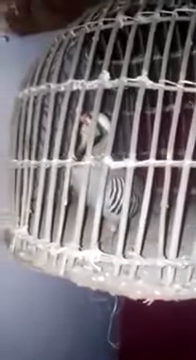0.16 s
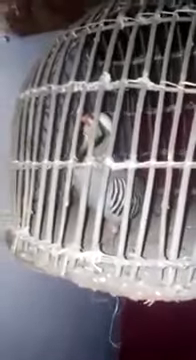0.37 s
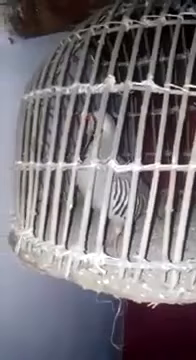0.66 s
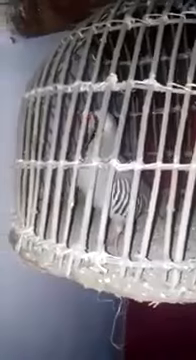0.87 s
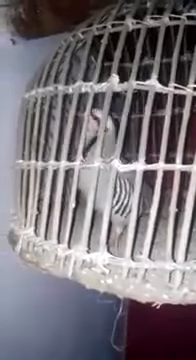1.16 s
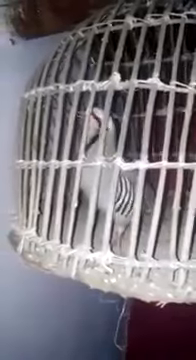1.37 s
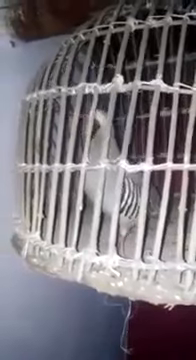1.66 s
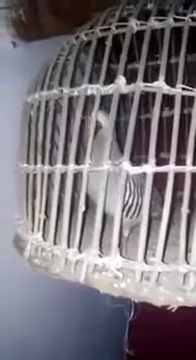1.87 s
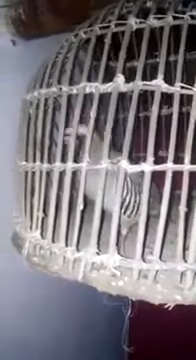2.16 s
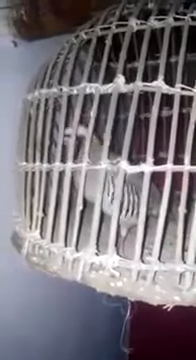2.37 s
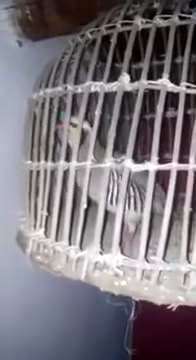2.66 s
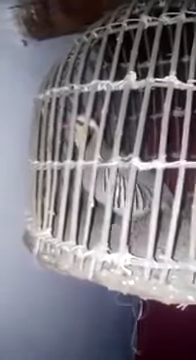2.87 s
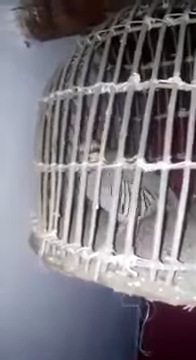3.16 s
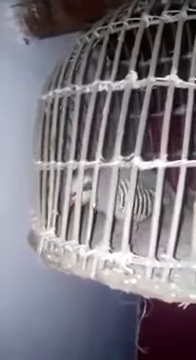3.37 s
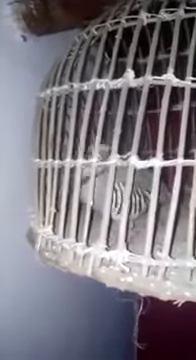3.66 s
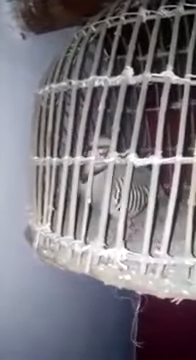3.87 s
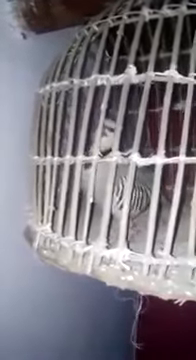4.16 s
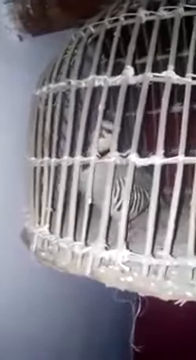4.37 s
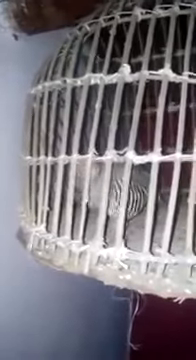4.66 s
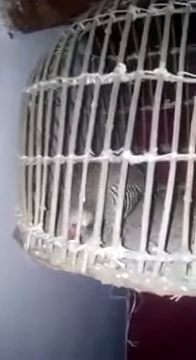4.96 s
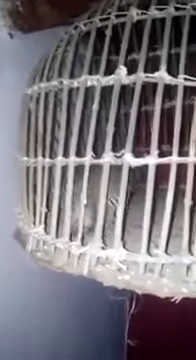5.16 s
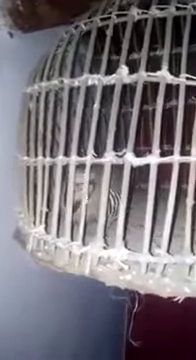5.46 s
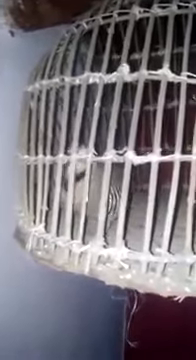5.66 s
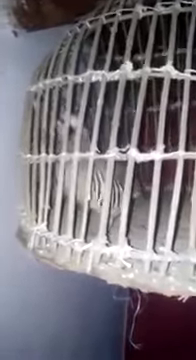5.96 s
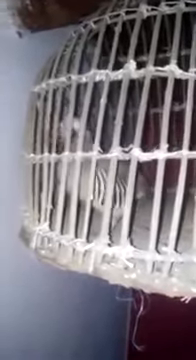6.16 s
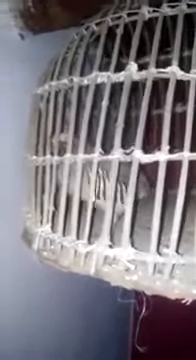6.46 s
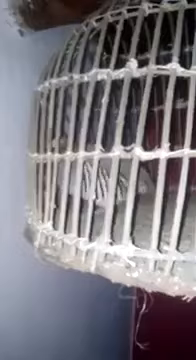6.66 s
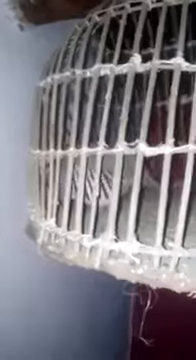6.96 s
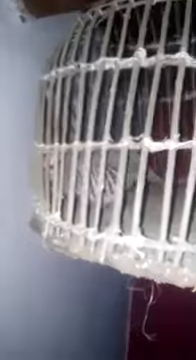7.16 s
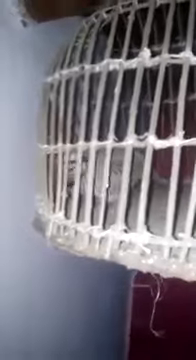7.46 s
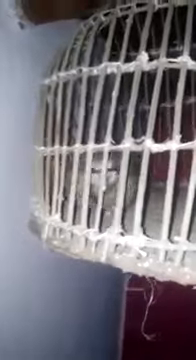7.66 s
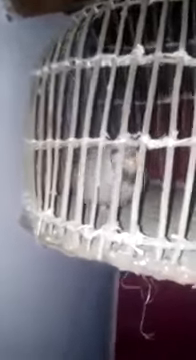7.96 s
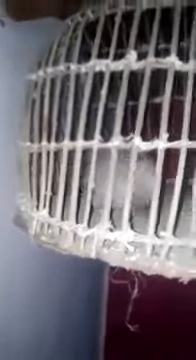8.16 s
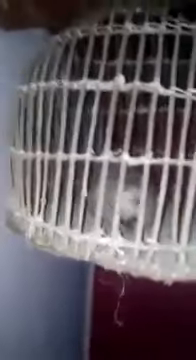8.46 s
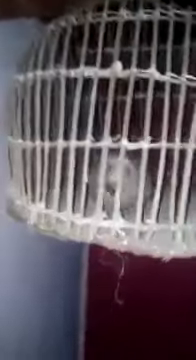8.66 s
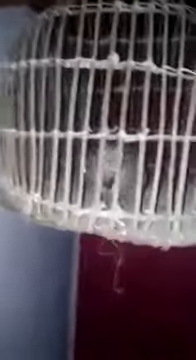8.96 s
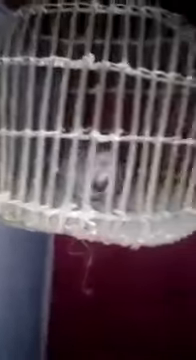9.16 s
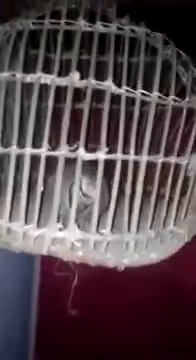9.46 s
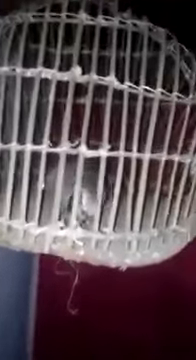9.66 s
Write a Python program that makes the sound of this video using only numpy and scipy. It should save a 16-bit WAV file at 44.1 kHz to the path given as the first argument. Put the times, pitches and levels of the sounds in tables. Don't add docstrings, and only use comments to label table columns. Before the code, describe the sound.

Harsh, evenly repeated bird crows with soft notes between them break into clucks and quick low chuckles, then quiet foot rustles in a small bare room.

```python
import sys
import numpy as np
from scipy import signal
from scipy.fft import rfft, irfft, next_fast_len
from scipy.io import wavfile
from scipy.ndimage import uniform_filter1d, minimum_filter1d, map_coordinates

SR = 44100
rng = np.random.default_rng(int(sys.argv[2]) if len(sys.argv) > 2 else 0)


def gain_from_db(level_db):
    decades = np.asarray(level_db, float) / 20
    return 10 ** decades


def to_wav(s):
    ch = np.atleast_2d(s).T
    pcm = np.round(np.clip(ch, -1, 1) * 32767)
    wavfile.write(sys.argv[1], SR, pcm.astype(np.int16))


N = 432614

# frequency in Hz, level in dB per Hz.
AIR_SPECTRUM = [(25, -16), (70, -8), (85, 5), (100, -8), (250, -11), (500, -22), (1500, -30), (2600, -23),
                (4000, -15), (7000, -16), (9000, -24), (14000, -28)]
# time in seconds, level in dB.
AIR_LEVEL = [(0, -83), (4.4, -83), (4.9, -90), (8.1, -88), (8.45, -83), (8.7, -88), (9.8, -89)]
# frequency in Hz, time to fall 60 dB in seconds.
ROOM_DECAY = [(400, 0.28), (1500, 0.23), (4000, 0.21), (10000, 0.15)]
TAIL_RENEWAL_S = 0.37

# start in seconds, peak in dB, thump in dB.
RUSTLES = [(8.1534, -51.5, -2.5), (8.202, -41, -28.5), (8.381, -42, -9), (8.482, -58.5, 3),
           (8.5899, -46, -26), (8.823, -53.5, 4), (8.9792, -68.5, -4), (9.0407, -50.5, -20),
           (9.3005, -47.5, -25), (9.56, -66, -9), (9.652, -63, -12), (9.7506, -49, -11),
           (9.7759, -37, -3.5), (9.8041, -22.5, -36)]
# frequency in Hz, level in dB per Hz.
SCRATCH_SPECTRUM = [(710, -52.5), (1200, -36), (2930, -13), (3350, -3.5), (5670, -7), (12600, -21),
                    (14000, -43.5)]
# frequency in Hz, level in dB per Hz.
THUMP_SPECTRUM = [(18, -34), (30, -13.5), (193, -5.5), (491, -12.5), (782, -14), (1270, -41), (1600, -36),
                  (2080, -66), (3520, -120)]
RUSTLE_S = 0.053

# start in seconds, peak in dB, low tones in dB, length in seconds.
SOFT_NOTES = [(0.009, -25, -15, 0.071), (0.384, -22, -16.5, 0.0634), (0.81, -21.5, -16, 0.0631),
              (1.221, -20, -18, 0.057), (1.648, -21, -14, 0.0577), (2.0744, -22.5, -17, 0.05),
              (2.51, -22, -14, 0.037), (2.791, -26, -32, 0.046), (3.126, -21, -15, 0.0592),
              (3.219, -23, -17, 0.059), (3.565, -20, -14, 0.095), (3.883, -21.5, -12, 0.0477),
              (4.158, -23.5, -14, 0.12), (4.445, -44.5, -34, 0.01533)]
# frequency in Hz, level in dB per Hz.
SOFT_BODY = [(180, -82), (300, -42.5), (561, -25.5), (872, -12), (1020, -11), (1750, -3), (1910, 2),
             (2260, -5), (2610, -4.5), (3230, -47), (5090, -12.5), (9000, -53), (11700, -80.5),
             (19800, -120)]
# start in seconds, peak in dB, low tones in dB, length in seconds, pitch in Hz.
CHUCKLE_THROBS = [(5.2324, -62, 26, 0.0175, 564), (6.44, -35, -4, 0.0155, 526),
                  (6.4672, -17, -7.5, 0.013, 581.6), (6.4957, -29, 0, 0.023, 548.5),
                  (6.533, -34, 6.5, 0.01534, 390.1), (6.701, -29.5, -1, 0.028, 622),
                  (6.7344, -25, -4.5, 0.021, 780), (6.8614, -22.5, 0, 0.033, 642),
                  (7.0306, -22.5, -5.5, 0.033, 790), (7.0728, -22, -3.5, 0.019, 825.6),
                  (7.1123, -25.5, -5.5, 0.0161, 519), (7.1895, -25, 0.5, 0.029, 412.4),
                  (7.3072, -25, -2, 0.022, 557), (7.3226, -19, -2.5, 0.03, 662),
                  (7.4047, -21, -3, 0.013, 373.7), (7.572, -37.5, -0.5, 0.0118, 530),
                  (7.5855, -14.5, -15, 0.016, 567.8), (7.6218, -14, -12, 0.01056, 580),
                  (7.659, -22.5, -4, 0.019, 523)]
# frequency in Hz, level in dB per Hz.
CHUCKLE_BODY = [(150, -57), (250, -14.5), (664, -7.5), (899, -10), (1300, -7), (1590, -17.5), (2050, -3),
                (3180, -13), (4160, -2.5), (4680, -6.5), (12000, -39.5), (14000, -61)]
# start in seconds, peak in dB, low tones in dB, length in seconds, pitch in Hz.
LAST_NOTES = [
    (7.905, -46.5, 14.5, 0.033, 578),
    (8.98, -54, -14, .02, 2200),
]

# frequency in Hz, gain in dB.
THROAT = [(230, -27.5), (410, -20.5), (475, 4), (560, -2.5), (700, -9.5), (1000, -6.5), (1400, -4.5),
          (2400, -4.5), (3200, -10), (3600, -32)]
# start in seconds, length in seconds, level in dB, widest beak resonance in Hz,
# hoarseness in dB.
CLUCKS = [(4.979, 0.15, -22, 1684, 8), (5.048, .12, -22.5, 1600, 23), (5.19, .045, -31, 1220, 25),
          (5.299, 0.053, -26, 1562, 25.5), (5.328, 0.094, -23, 1150, 4), (5.475, .085, -17, 1574, -2),
          (5.688, 0.1377, -17, 1658, -6.5), (5.969, 0.17, -18, 1450, -3.5), (6.207, 0.06, -18.5, 2237, 9.5)]
# share of length, effort in dB, beak opening from 0 to 1,
# extra breath in dB, low partials in dB.
CLUCK_SHAPE = [(0, -27, .98, 3.5, 11.5), (.15, -5, 0.87, 4, -11.5), (.55, -0.5, .5, -2, -17),
               (1, -9.5, 0, -0.5, -11)]
# time in seconds, pitch in Hz, upper partials in dB.
CLUCK_VOICE = [(4.98, 521.3, -28), (5.045, 543.6, -2), (5.074, 686, 1), (5.16, 643.4, -5),
               (5.236, 586, -2.5), (5.3, 636, -8), (5.353, 526, -17.5), (5.409, 513, -24.5),
               (5.475, 646.7, -9.5), (5.558, 612, -14.5), (5.689, 452.6, -10.5), (5.821, 454.4, -8.5),
               (5.97, 623, -3.5), (6.03, 565.7, -23), (6.119, 568.4, -18), (6.205, 502.3, -1.5),
               (6.259, 534, -9.5)]
# frequency in Hz, level in dB per Hz.
CLUCK_HISS = [(1880, -21), (3200, -9), (3970, -2.5), (4470, -5), (6270, -12), (8030, -38.5), (12300, -46.5),
              (13200, -32), (14000, -88.5)]
CLUCK_SHUT_RATIO, CLUCK_HISS_DB = 0.83, -15

# start in seconds, length in seconds, level in dB, widest beak resonance in Hz,
# share of the length at which the beak is widest.
CROWS = [(0.117, 0.22, -9, 1519, 0.5015), (0.523, .225, -9, 1815, 0.39), (0.932, 0.23, -9.5, 1720, 0.41),
         (1.358, 0.2441, -9, 1840, 0.39), (1.783, 0.2, -9.5, 1507, 0.58), (2.145, 0.26, -9, 1736, 0.48),
         (2.533, .24, -9, 1885, 0.45), (2.94, 0.18, -10.5, 1450, 0.49), (3.279, 0.19, -11.5, 1620, 0.35),
         (3.591, .2, -9, 1670, 0.57), (3.921, 0.17, -10, 1743, 0.47), (4.207, .19, -11, 2040, 0.38),
         (4.558, 0.18, -11, 1850, 0.57)]
# share of length, effort in dB,
# beak opening from 0 to 1, extra breath in dB, low partials in dB.
CROW_SHAPE = [(0, -14, 0, -14, -1.5), (.07, -6.5, 0.83, 7.5, -11.5), (0.271, 0.5, 0.5, 1, -15),
              (0.451, -2, 1.05, 1.5, -13), (.65, -.5, 0.55, .5, -14), (.85, -3, 0.2, 1, -16),
              (1.001, -5, .02, 0, -10.5)]
# time in seconds, pitch in Hz, shut beak resonance in Hz,
# fundamental over second partial in dB, upper partials in dB.
CROW_VOICE = [(0.113, 509.6, 1277, -6.5, -17), (.525, 491.8, 1266, -3, -18.5), (.93, 470.3, 1260, 0, -19.5),
              (1.354, 466.5, 1174, 2.5, -23), (2.145, 460, 1218, -1.5, -19), (2.53, 517.3, 1335, -5, -14.5),
              (2.94, 481.4, 1190, 6.5, -16), (3.28, 443.6, 1680, -19.5, -6.5),
              (3.591, 469.8, 1712, -33, -16.5), (3.92, 468.8, 1426, 9, -15.5),
              (4.21, 399.2, 1513, -10.5, -9.5), (4.555, 407.7, 1543, -15, -10)]
# time in seconds, share of air noise.
CROW_RASP = [(0.115, .28), (.93, .23), (1.785, .13), (2.145, .28), (2.94, .2), (3.28, .3), (3.59, .16),
             (3.92, .16), (4.21, .3)]
# frequency in Hz, level in dB per Hz.
CROW_HISS = [(1880, -12), (3200, -34), (3420, -18.5), (3710, -2.5), (4120, -16), (4810, 1), (5540, -7.5),
             (6390, -3.5), (6800, -6), (7230, -14), (8540, -50.5), (12500, -24), (14000, -52.5)]
CROW_START, CROW_END = 0.93, 0.91
CROW_HISS_DB, UPPER_DB_PER_KHZ, HISS_DB_PER_KHZ = -19.5, 18.5, 24

# frequency in Hz, side under the middle in dB.
SIDE_SPREAD = [(3300, -55), (4200, -8), (6000, -6), (13000, -5)]
TOP_HZ = 13100


def unit(x):
    return x / np.sqrt(np.mean(x ** 2) + 1e-20)


def along(points, hz):
    f, v = np.transpose(points)
    return np.interp(np.log(hz + 1), np.log(f + 1), v)


def wobble(n, rate):
    knots = rng.standard_normal(int(n * rate / SR) + 4)
    return map_coordinates(knots, [np.arange(n) * rate / SR])


def filtered(x, gain):
    m = next_fast_len(x.shape[-1] + 4096)
    spectrum = rfft(x, m) * gain(np.fft.rfftfreq(m, 1 / SR))
    return irfft(spectrum, m)[..., :x.shape[-1]]


def add(track, s, x):
    part = track[round(s * SR):][:len(x)]
    part += x[:len(part)]


def room_air():
    air = unit(filtered(rng.standard_normal(N), lambda f: gain_from_db(along(AIR_SPECTRUM, f))))
    air_db = np.interp(np.arange(N) / SR, *np.transpose(AIR_LEVEL))
    return gain_from_db(air_db + 24.5) * air


def room(x):
    out, step = np.zeros(N + SR), round(TAIL_RENEWAL_S * SR)
    late = np.pad(x, (step + 130, 2 * step))
    for start in range(0, N + step, step):
        hz, t, z = signal.stft(rng.standard_normal(SR // 2), SR, nperseg=256)
        decay = gain_from_db(-60 * t / along(ROOM_DECAY, hz)[:, None])
        tail = signal.istft(z * decay, SR, nperseg=256)[1]
        source = late[start:][:2 * step] * np.hanning(2 * step)
        answer = signal.fftconvolve(source, tail / np.linalg.norm(tail))
        add(out, max(start - step, 0) / SR, answer[max(step - start, 0):])
    return out[:N]


def swell(length, rise):
    t = np.arange(round((length + 0.026) * SR)) / SR
    return (1 - np.exp(-(t / rise) ** 2)) * gain_from_db(-60 * np.clip(t - length, 0, 1) / 0.023)


def rustles():
    out = np.zeros(N)
    for s, db, thump_db in RUSTLES:
        shape = swell(RUSTLE_S, 0.0022)
        n = len(shape)
        shape = shape * np.exp(-np.arange(n) / SR / 0.04) * gain_from_db(2 * wobble(n, 90))
        noise = rng.standard_normal((2, n))
        scratch = unit(filtered(noise[0], lambda f: gain_from_db(along(SCRATCH_SPECTRUM, f))))
        thump = unit(filtered(noise[1], lambda f: gain_from_db(along(THUMP_SPECTRUM, f))))
        add(out, s, gain_from_db(db - 5.0) * shape * (scratch + gain_from_db(thump_db + 10.5) * thump))
    return out


def syrinx(hz, jitter, shimmer_db, share):
    n = len(hz)
    turns = np.cumsum(hz * (1 + jitter * wobble(n, 90))) / SR
    pulses = np.diff(np.floor(turns), prepend=0) * gain_from_db(shimmer_db * rng.standard_normal(n))
    bends = rng.uniform(0, 2 * np.pi, size=50)
    air = rng.standard_normal(n) * (1 + 0.14 * np.cos(2 * np.pi * turns))

    def noisy(f):
        return np.clip(share * (0.4 + f / 1500), 0, 1)

    def clear(f):
        phase = np.interp(f, np.linspace(0, SR / 2, len(bends)), bends)
        return np.sqrt(1 - noisy(f)) * np.exp(1j * phase)

    return filtered(unit(pulses), clear) + filtered(unit(air), lambda f: np.sqrt(noisy(f)))


def notes(table, sag, high_db, body, low_hz, jitter, share, rise, lead, trim_db):
    out = np.zeros(N)
    for s, db, low_db, length, hz in table:
        length = max(length, 0.004)
        tone, burst = swell(length + lead, rise), swell(length, rise)
        burst = np.pad(burst, (len(tone) - len(burst), 0)) + 0.059 * tone
        voice = syrinx(np.linspace(hz, hz * sag, len(tone)), jitter, 150 * jitter, share)

        def part(a, b):
            return unit(filtered(voice, lambda f: gain_from_db(along(body, f)) * (f >= a) * (f < b)))

        low = gain_from_db(low_db) * tone * part(0, low_hz)
        throat = burst * (part(low_hz, 3800) + gain_from_db(high_db) * part(3400, SR))
        add(out, max(s - rise - lead, 0), gain_from_db(db + trim_db) * (low + throat))
    return out


def soft_notes():
    table = [(*row, 590) for row in SOFT_NOTES]
    return notes(table, 0.96, -15, SOFT_BODY, low_hz=1000, jitter=0.016, share=0.22,
                 rise=0.008, lead=0.003, trim_db=-8)


def chuckles():
    return notes(CHUCKLE_THROBS, 0.95, -2.5, CHUCKLE_BODY, low_hz=1450, jitter=0.019, share=0.23,
                 rise=0.008, lead=0.013, trim_db=-8.5)


def last_notes():
    return notes(LAST_NOTES, 0.985, -3, CHUCKLE_BODY, low_hz=2000, jitter=0.008, share=0.12,
                 rise=0.004, lead=0.002, trim_db=-12)


def mouth(s0, length, db, wide_hz, shape, shut_hz, upper_db, hiss_db, upper_db_per_khz, hiss_db_per_khz):
    share, effort_db, opening, breath_db, low_db = np.transpose(shape)
    lift_hz = opening * (wide_hz - shut_hz)
    lift_khz = lift_hz / 1000
    upper = upper_db + breath_db + upper_db_per_khz * lift_khz
    hiss = hiss_db + breath_db + hiss_db_per_khz * lift_khz * opening ** 1.4
    return [s0 + length * share, db + effort_db, shut_hz + lift_hz, upper, hiss, low_db]


def call(rows, hz, first_db, hiss_colour, jitter, shimmer_db, share, beak_db, beak_width_hz, under):
    s, db, beak_hz, upper_db, hiss_db, low_db = rows
    t = s[0] + np.arange(round((s[-1] - s[0] + 0.016) * SR)) / SR
    f, frames, z = signal.stft(syrinx(hz(t), jitter, shimmer_db, share), SR, nperseg=256)
    f = f[:, None]

    def at(v):
        return np.interp(s[0] + frames, s, v)

    def norm(g):
        return g / np.sqrt(np.mean(g ** 2, 0))

    beak = gain_from_db(beak_db) / (1 + (2 * (f - at(beak_hz)) / beak_width_hz) ** 2)
    body = gain_from_db(along(THROAT, f)) * (1 + beak)
    first, low, upper = f < 650, f < 1000, f > 2200
    flares = uniform_filter1d(rng.standard_normal(z.shape), size=3, axis=0)
    flares = uniform_filter1d(flares, size=20, axis=1)
    hiss = norm(gain_from_db(along(hiss_colour, f) + 5 * unit(flares)))
    gain = norm(body * ~low * ~upper)
    gain = gain + norm(body * low * gain_from_db(first_db * first)) * gain_from_db(at(low_db) - 2.5)
    gain = gain + norm(body * upper) * gain_from_db(at(upper_db) - 1.0)
    gain = gain + hiss * gain_from_db(at(hiss_db) - 1.5)
    x = signal.istft(z * gain, SR, nperseg=256)[1][:len(t)]
    fade = np.clip((t - t[0]) / 0.00053, 0, 1) * np.clip((t[-1] - t) / 0.03, 0, 1)
    x = filtered(x, lambda f: under + (1 - under) / (1 + (455 / (f + 1)) ** 24))
    return x * fade * gain_from_db(np.interp(t, s, db) + 2.2 * wobble(len(t), 60))


def clucks():
    out = np.zeros(N)
    when, pitch_hz, bright_db = np.transpose(CLUCK_VOICE)
    share = np.transpose(CLUCK_SHAPE)[0]
    for s0, length, db, wide_hz, hoarse_db in CLUCKS:
        upper_db = np.interp(s0 + length * share, when, bright_db)
        rows = mouth(s0, length, db, wide_hz, CLUCK_SHAPE, CLUCK_SHUT_RATIO * wide_hz, upper_db,
                     CLUCK_HISS_DB + hoarse_db, upper_db_per_khz=-6, hiss_db_per_khz=8)
        cluck = call(rows, lambda t: np.interp(t, when, pitch_hz), -15.0, CLUCK_HISS, jitter=0.022,
                     shimmer_db=3, share=0.17, beak_db=16.5, beak_width_hz=247, under=1.0)
        add(out, s0, cluck)
    return out


def crows():
    out = np.zeros(N)
    s, *voice = np.transpose(CROW_VOICE)
    share, *course = np.transpose(CROW_SHAPE)
    for s0, length, db, wide_hz, widest in CROWS:
        hz, shut_hz, first_db, upper_db = [np.interp(s0, s, v) for v in voice]
        moments = [s0, s0 + length * widest, s0 + length]
        arch = np.poly1d(np.polyfit(moments, [hz * CROW_START, hz, hz * CROW_END], 2))
        stretched = np.interp(share, share[[0, 1, 3, -1]], [*share[:2], widest, 1])
        rows = mouth(s0, length, db, wide_hz, np.transpose([stretched, *course]), shut_hz, upper_db,
                     CROW_HISS_DB, UPPER_DB_PER_KHZ, HISS_DB_PER_KHZ)
        rasp = np.interp(s0, *np.transpose(CROW_RASP))
        crow = call(rows, arch, first_db, CROW_HISS, jitter=0.12 * rasp, shimmer_db=17 * rasp,
                    share=rasp, beak_db=21.5, beak_width_hz=400, under=0.25)
        add(out, s0, crow)
    return out


def scene():
    voice = crows() + clucks() + soft_notes() + chuckles() + last_notes()
    bird = filtered(voice, lambda f: 1 / (1 + (300 / (f + 1)) ** 4))
    mid = bird + gain_from_db(-4.5) * room(bird) + rustles() + room_air()
    return np.array([mid, mid])


def noise_gate(x):
    key = np.abs(uniform_filter1d(filtered(x, lambda f: f > 250) ** 2, size=600))
    key_db = 10 * np.log10(key + 1e-12)
    gate_db = -26 / (1 + np.exp((key_db + 58) / 3))
    gate_db = -minimum_filter1d(-gate_db, size=1801, origin=900)
    return x * gain_from_db(uniform_filter1d(gate_db, size=500))


def patchy_treble(x):
    hz, t, z = signal.stft(x, SR, nperseg=2048)
    band = (hz // 900).astype(int)
    luck = rng.standard_normal((band.max() + 1, len(t)))
    luck = unit(uniform_filter1d(luck, size=3, axis=1))[band]
    usual = np.sqrt(np.abs(uniform_filter1d(np.abs(z) ** 2, size=40, axis=0)))
    kept = np.abs(z) > usual * (1.2 + 1.1 * luck)
    top = (hz[:, None] > 7500) & (usual > gain_from_db(-100))
    z = z * np.where(top, kept, 1) * (hz[:, None] < TOP_HZ)
    return signal.istft(z, SR, nperseg=2048)[1][:N]


def treble_sides(x):
    hz, t, z = signal.stft(x, SR, nperseg=1024)
    turn = np.exp(2j * np.pi * rng.random(z.shape))
    spread = gain_from_db(along(SIDE_SPREAD, hz))[:, None]
    side = signal.istft(z * turn * spread, SR, nperseg=1024)[1][:N]
    return np.array([x + side, x - side])


def roll_off(x):
    return signal.sosfilt(signal.butter(12, 14250, fs=SR, output="sos"), x)


def record(dry):
    x = noise_gate(dry[0])
    x = x / (1 + np.abs(x / 0.93) ** 5) ** (1 / 5)
    return roll_off(treble_sides(patchy_treble(x)))


dry = scene()
out = record(dry)
to_wav(out)
```